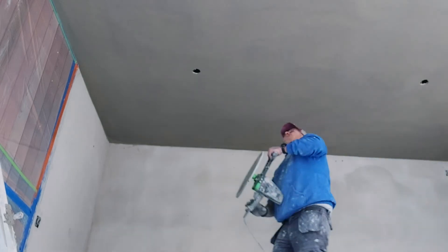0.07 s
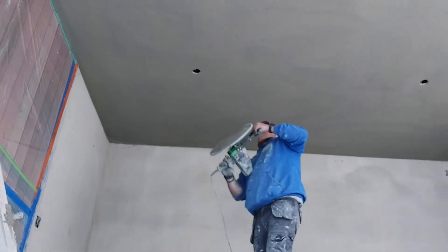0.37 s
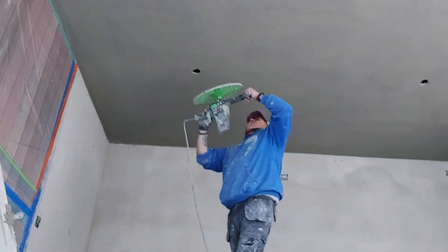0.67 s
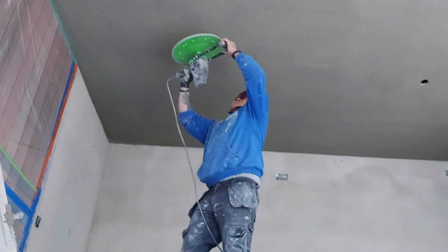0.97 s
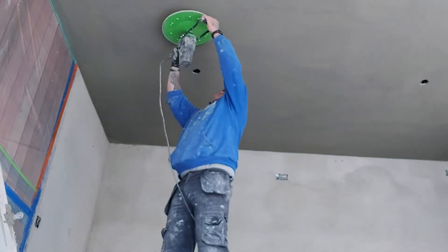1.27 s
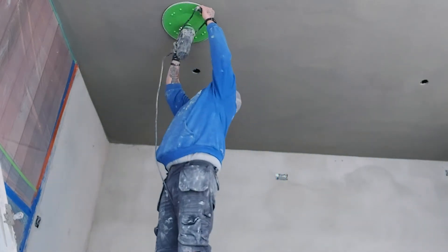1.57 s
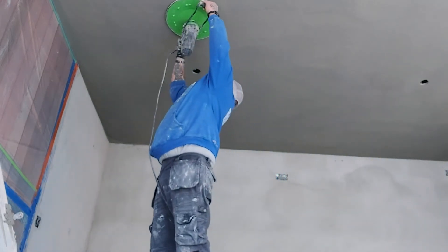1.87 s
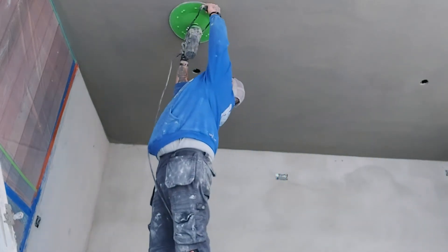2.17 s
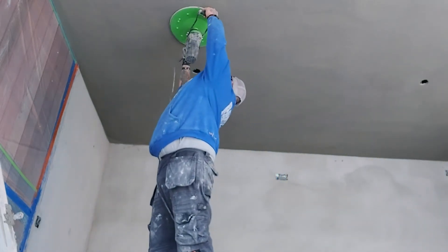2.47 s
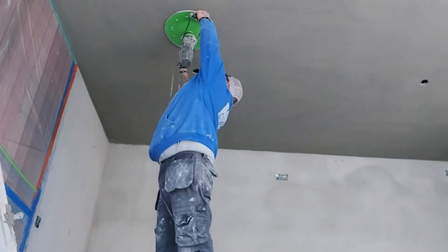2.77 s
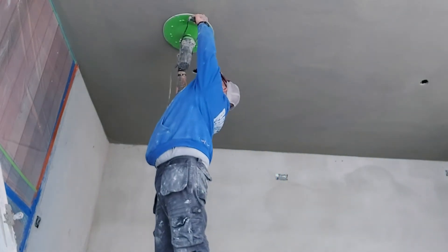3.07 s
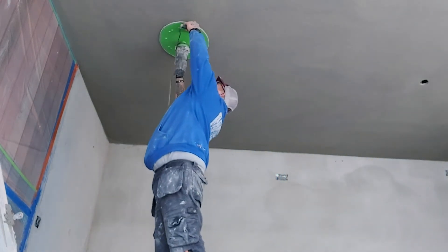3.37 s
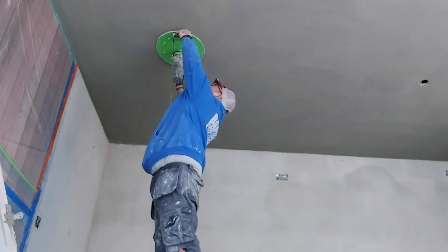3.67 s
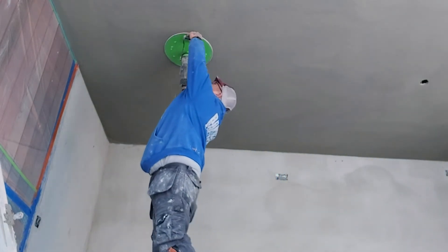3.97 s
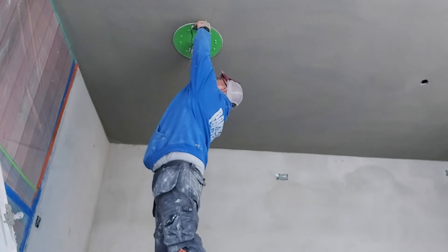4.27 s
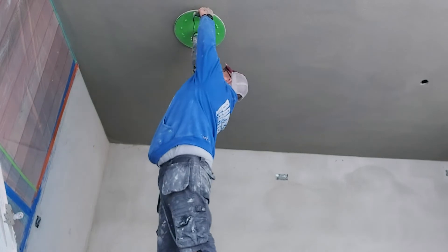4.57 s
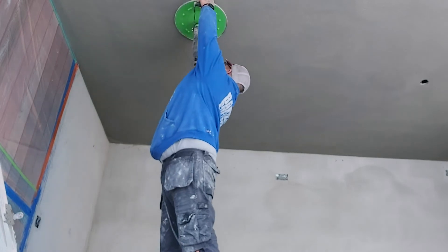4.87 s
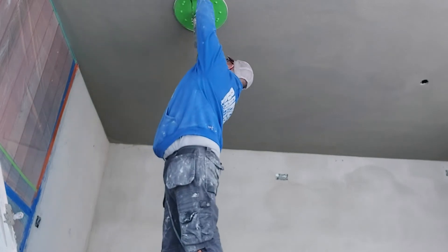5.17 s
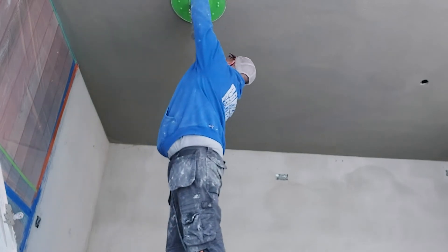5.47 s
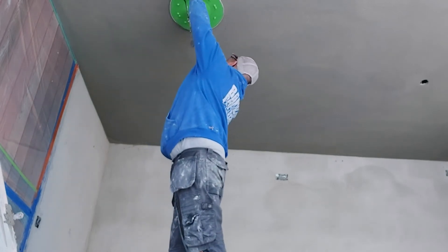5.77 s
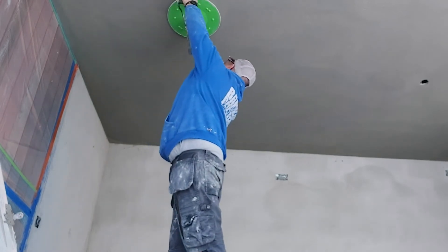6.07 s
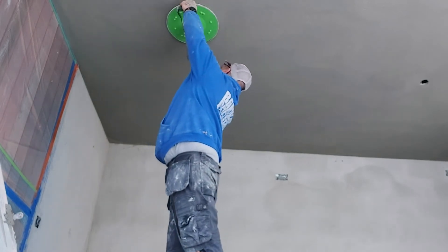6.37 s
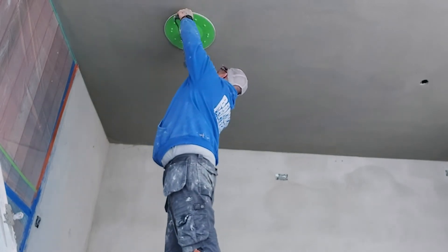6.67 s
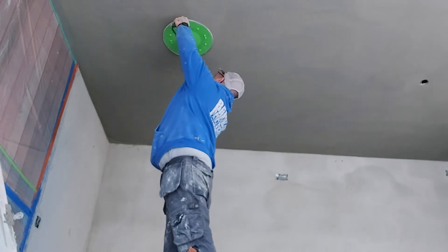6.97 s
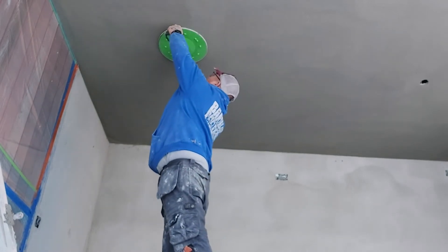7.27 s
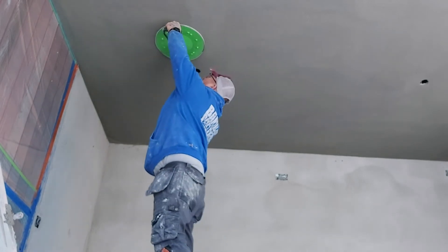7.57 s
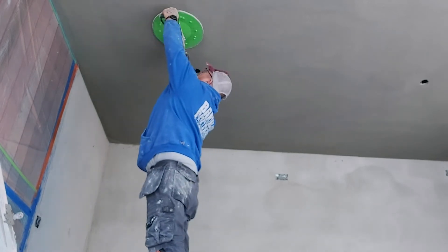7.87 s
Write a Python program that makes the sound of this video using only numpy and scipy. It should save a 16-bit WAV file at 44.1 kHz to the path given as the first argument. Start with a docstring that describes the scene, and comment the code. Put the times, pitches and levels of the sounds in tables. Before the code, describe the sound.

An electric plastering float bumps and scuffs as it is handled, then spins up and works a ceiling without stopping. The motor's hum and fan whistle dip slightly in pitch under pressure, mixed with gear rattle, short squeals and a steady airy hiss. Gritty scrapes come and go as the pad passes over coarser plaster. The microphone is in the same bare room, picking up a little of its short echo.

```python
"""Electric float on a plaster ceiling

In a bare room a plasterer lifts his float; it knocks in his hands and its pad scuffs the ceiling.
The motor starts softly and whirrs on, sagging as he leans in: the rotor hums, the fan whistles,
the gears sing, squeal and rattle, the pad scrapes over sandy plaster and the vents hiss."""
import sys
import numpy as np
from scipy import signal
from scipy.fft import rfft, irfft, next_fast_len
from scipy.io import wavfile

SR = 44100
rng = np.random.default_rng(int(sys.argv[2]) if len(sys.argv) > 2 else 0)


def store_pcm(level_fs):
    """Save levels as 16-bit WAV."""
    pcm = np.round(np.clip(level_fs, -1, 1) * 32767).astype(np.int16)
    wavfile.write(sys.argv[1], SR, np.atleast_2d(pcm).T)


N = 348831
TIME = np.arange(N) / SR
ON_S, RUN_UP_S, ENGAGE_S = 1.4, .208, .14  # soft start: switch-on, speed time constant, fade-in
FULL_SPEED_HZ, FAN_BLADES = 408, 11
PINION_TEETH, WHEEL_TEETH, SECOND_PINION_TEETH = 5, 67, 11
ROOM_T60_S, ROOM_TONE_DB = .3, -54

# Bumps as the float goes up. Each row: start in seconds, relative level in dB, scuff trim in dB,
# contact time in seconds, housing ring in dB.
CONTACTS = [(0.0, -58, -2, 0.01, -58), (0.094, -41, -18, 0.013, -53), (0.224, -45.5, -5, 0.035, -52),
            (0.311, -45, -6.5, .02, -54), (0.37, -59.5, 0.5, 0.081, -71), (0.472, -57, 0.5, 0.011, -69),
            (0.585, -61, 3, .02, -51), (0.615, -62, 9, 0.018, -57), (0.685, -61, 3, 0.02, -51),
            (0.8, -60, -1, 0.042, -76), (0.868, -48, -7.5, 0.023, -60), (1.0, -51, -6, 0.06, -61),
            (1.048, -35.5, -2, 0.041, -64), (1.19, -62, -12, 0.016, -57), (1.279, -42, -14, 0.073, -68),
            (1.385, -60, 4.5, 0.13, -54)]
# The housing's ring. Each row: pitch in Hz, bandwidth in Hz, relative level in dB.
HOUSING_MODES = [(1797, 20, 2), (1960, 34, -1), (2166, 32, 3)]

# Tone colours of the noise layers. Each row: frequency in Hz, relative level in dB.
KNOCK_EQ = [(88, -49), (150, -22), (298, -5.5), (413, 4), (456, -5), (527, -1), (1180, -15), (1300, -35),
            (1690, -43), (2860, -120)]
SCUFF_EQ = [(88, -48), (150, -14), (348, -16), (759, -0.5), (1080, 0), (1240, -12), (1310, -1),
            (1900, -5.5), (2650, -14), (2920, -7), (3290, -9), (4490, -6.5), (7320, -10), (8900, -20),
            (16000, -24)]
ROOM_EQ = [(15, -35), (25, -8), (82, 6.5), (223, -6), (405, -2.5), (607, -9), (936, -6.5), (1260, -16),
           (1740, -6.5), (2000, -13), (2480, -8), (7920, -20), (9320, -30), (13200, -23.5), (16000, -42)]
RUB_EQ = [(25, -82), (55, -33), (82, -6.5), (120, -17), (170, -11.5), (280, -13.5), (450, -4), (560, 3.5),
          (760, -7.5), (950, 1.5), (1100, -8), (1280, -25), (1800, -57)]
HISS_EQ = [(900, -23.5), (1280, -10), (1670, 2.5), (2020, 5), (2500, 3), (3000, 7), (5000, -6.5),
           (5850, -7.5), (6950, -7.5), (7800, -3.5), (8600, -13.5), (9550, -19), (11200, -12),
           (15500, -19.5)]  # shared by rasp, rattle and vents

# The speed the motor heads for under load. Each row: time in seconds, turns per second.
MOTOR_SPEED = [(2.6, 412.0), (3.0, 413.3), (3.55, 408.0), (3.73, 409.5), (3.9, 419.5), (4.08, 423.0),
               (4.27, 420.0), (4.45, 414.0), (5.1, 405.5), (5.44, 398.6), (5.72, 405.0), (6.62, 412.0),
               (6.76, 409.5), (7.08, 401.5), (7.33, 409.5), (7.78, 407.0), (7.91, 403.5)]
# Faint tones that fill out the whirr. Each row: multiple of rotor speed, relative level in dB.
WHIRR_PARTIALS = [(2, -59), (6, -59), (7, -58), (9, -60), (12, -59), (13, -59), (14, -54), (15, -47),
                  (16, -54), (17, -56), (19, -49), (20, -59), (22, -58), (24, -67), (25, -64), (32, -69),
                  (36, -70)]
# Top end of the second gear stage. Each row: multiple of its tooth rate, level in dB.
GEAR_PARTIALS = [(4, -50), (5, -45.5), (6, -53), (7, -58.5)]

# Fader rides. Each row: time in seconds, relative level in dB.
HUM_RIDE = [(1.66, -65), (1.74, -42), (1.98, -43), (2.3, -33.7), (3.34, -31.5), (3.42, -41), (4.46, -32.5),
            (4.78, -35), (5.26, -33.0), (5.42, -41.5), (5.58, -33.5), (6.7, -32.5), (7.02, -36.5),
            (7.89, -37)]
WHISTLE_RIDE = [(1.6, -33), (1.84, -31), (1.9, -42), (1.96, -28.5), (2.2, -34), (2.26, -30), (2.5, -32.5),
                (2.8, -35.5), (3.1, -29.0), (3.28, -41), (3.4, -31.5), (4.18, -35.5), (4.24, -44),
                (4.66, -26), (4.96, -29), (5.32, -31.5), (5.62, -25.5), (6.34, -33.5), (6.58, -33),
                (6.64, -39), (6.76, -32), (7.18, -42), (7.3, -27.5), (7.6, -34.5), (7.72, -31),
                (7.9, -40.1)]  # swells and fades as the float is swept about
LOW_WHISTLE_RIDE = [(1.6, -35), (1.9, -34), (2.56, -53), (2.74, -43), (3.04, -48.9), (3.1, -35),
                    (3.28, -42), (3.4, -36), (3.52, -45), (4.0, -37), (4.12, -45), (4.24, -35.5),
                    (4.42, -43), (4.48, -33), (5.14, -39), (5.5, -41), (5.92, -28), (6.76, -51),
                    (6.82, -43.5), (7.9, -47)]
GEAR_SONG_RIDE = [(1.8, -54), (1.96, -33), (2.04, -44), (3.08, -55.5), (3.32, -39.5), (3.8, -61),
                  (4.04, -38), (4.52, -47.5), (5.16, -37.6), (6.04, -39.5), (6.68, -50.5), (7.08, -33.5),
                  (7.4, -51), (7.89, -42)]
GEAR_OCTAVE_RIDE = [(1.9, -49), (2.98, -41), (4.06, -49), (5.74, -63), (5.98, -33.5), (6.16, -53),
                    (6.64, -34), (7.48, -58.5), (7.9, -36)]
VENT_RIDE = [(2.1, -31.5), (2.11, -32), (2.86, -31.5), (3.29, -32), (3.38, -29.5), (3.81, -34), (4.51, -33),
             (7.72, -33.5), (7.9, -34)]
# How hard the tool works. Each row: time in seconds, then relative levels in dB of disc rumble,
# pad rub and gear rattle.
WORK_RIDES = [(1.53, -45, -36, -39), (1.78, -50, -36, -37), (1.85, -50, -35.5, -36),
              (1.88, -49, -38, -37.5), (2.13, -49.5, -37, -37), (2.77, -50, -40.5, -37),
              (3.07, -49.5, -36, -37), (3.43, -56, -38, -34.5), (3.64, -44.5, -37.5, -37),
              (3.8, -53, -38, -40.5), (4.07, -51, -35.5, -38.5), (4.15, -44.5, -40, -38.5),
              (4.28, -55, -37, -38), (5.43, -52, -37.5, -39.5), (5.48, -75, -38, -38.5),
              (6.55, -52, -38, -38.5), (7.51, -54, -37, -39), (7.56, -51, -41.5, -40),
              (7.69, -60, -40.5, -38), (7.9, -53, -35.5, -39)]

# The pinion's whine flares up. Each row: start in seconds, length in seconds, level in dB.
PINION_SQUEALS = [(1.88, .09, -32), (2.53, 0.13, -37.5), (3.07, 0.11, -40), (3.92, 0.13, -35.5),
                  (4.24, 0.079, -31), (5.31, .11, -34), (5.5, 0.068, -38.5), (5.72, .22, -40.5),
                  (6.28, 0.055, -37), (6.75, 0.074, -34.5), (7.28, 0.26, -34), (7.62, 0.11, -33)]
# The pad hits coarser sand. Each row: start in seconds, length in seconds, relative level in dB.
SAND_SCRAPES = [(1.94, .04, -33), (2.07, 0.025, -33), (2.5, 0.053, -36), (2.68, 0.27, -38),
                (3.27, .22, -36), (4.41, .07, -31), (4.6, .2, -37), (5.0, 0.17, -36), (5.47, 0.049, -49),
                (5.74, 0.14, -33.5), (6.88, 0.071, -45)]

# Stereo focus. Each row: frequency in Hz, likeness of left and right from 0 to 1.
STEREO_LIKENESS = [(60, .95), (450, .96), (760, .65), (1350, .62), (1680, .3), (1950, .55), (2700, .12),
                   (4000, .33), (6000, .4), (8000, .2), (15000, .1)]
# Panning. Each row: frequency in Hz, left minus right in dB.
STEREO_BALANCE = [(200, -.9), (400, -3), (700, -2.8), (950, -.6), (1450, -2.3), (2600, 3.5), (3400, .2),
                  (4100, 0), (4500, -3.3), (5900, -7.5), (7400, -1), (8300, -7), (9800, 3), (13000, -.3)]
# Later arrival on the left. Each row: frequency in Hz, lag in seconds.
STEREO_LAG = [(100, .00005), (400, .00011), (700, .00005), (1100, .00014), (1300, .00035), (1550, .0003),
              (1800, .00003), (2200, 0), (3000, .00012), (4080, .000154), (4500, .000151), (5100, .000106),
              (7000, .000143), (15000, .00015)]
# Bounces off ceiling, arms and wall. Each row: delay in seconds, its sway in seconds, level in dB.
EARLY_REFLECTIONS = [(.0013, .0003, -13), (.0034, .0004, -12), (.0085, .0006, -11)]


def amp(db):
    """Decibels to gain."""
    return 10 ** (np.asarray(db) / 20)


def unit_rms(x):
    """Scale to an rms of 1."""
    return x / np.sqrt(np.mean(x ** 2) + 1e-20)


def ride(rows, column=1):
    """One column of an automation curve at every sample."""
    columns = np.transpose(rows)
    return np.interp(TIME, columns[0], columns[column])


def at_hz(points, hz):
    """Read a curve on a log-frequency axis."""
    freqs, values = np.transpose(points)
    return np.interp(np.log(np.maximum(hz, 1)), np.log(freqs), values)


def drift(rate_hz):
    """A smooth random wobble with a spread of about 1."""
    pole = np.exp(-80 * np.pi * rate_hz / SR)  # one step every 40 samples
    slow = signal.lfilter([1], [1, -2 * pole, pole * pole], rng.standard_normal(N // 40 + 2002))[2000:]
    return np.interp(np.arange(N) / 40, np.arange(len(slow)), unit_rms(slow))


def bursts(rows, attack_s, release_s):
    """Envelope of events that each rise, hold and die away."""
    return sum(amp(db) * np.clip((TIME - start) / attack_s, 0, 1)
               * np.exp(-np.maximum(TIME - start - length, 0) / release_s) for start, length, db in rows)


def grains(per_s, spread_db):
    """Grit: random ticks, a few harder than the rest."""
    sizes = amp(spread_db * np.minimum(rng.exponential(1, N), 5))
    return (rng.random(N) < per_s / SR) * sizes * rng.standard_normal(N)


def resonance(x, hz, width_hz):
    """A ringing band with unity gain at its peak."""
    r = np.exp(-np.pi * width_hz / SR)
    poles = [1, -2 * r * np.cos(2 * np.pi * hz / SR), r * r]
    return signal.lfilter(np.array([1, 0, -1]) * (1 - r * r) / 2, poles, x)


def split(x, hz):
    """Crossover: the lows and the highs."""
    low = signal.sosfilt(signal.butter(2, hz, "low", fs=SR, output="sos"), x)
    high = signal.sosfilt(signal.butter(2, hz, "high", fs=SR, output="sos"), x)
    return low, -high


def pan(hz):
    """Complex left and right gains that place the float by level and lag."""
    half_db = at_hz(STEREO_BALANCE, hz) / 2
    return np.array([amp(half_db) * np.exp(-2j * np.pi * hz * at_hz(STEREO_LAG, hz)), amp(-half_db)])


def in_room(excitation, eq):
    """Widen a noise with the room's diffuse wash and colour it; the mid has an rms of 1."""
    size = next_fast_len(N)
    hz = np.arange(size // 2 + 1) * SR / size
    alike = np.clip(at_hz(STEREO_LIKENESS, hz), 0, 1)
    direct = np.sqrt(alike) * rfft(unit_rms(excitation), size)
    wash = np.sqrt(1 - alike) * rfft(rng.standard_normal((2, N)), size)
    stereo = irfft((direct + wash) * pan(hz) * amp(at_hz(eq, hz)), size)[:, :N]
    return stereo / np.sqrt(np.mean(stereo.mean(axis=0) ** 2))


def reflected(x):
    """Nearby surfaces comb the sound; the combs shift as the float is swept about."""
    combed = x.copy()
    for delay, sway, db in EARLY_REFLECTIONS:
        late = TIME - delay - sway * drift(.552)
        combed += amp(db) * np.array([np.interp(late, TIME, channel) for channel in x])
    return combed / np.sqrt(1 + sum(amp(db) ** 2 for _, _, db in EARLY_REFLECTIONS))


def tone(turns, multiple, diffuse, fade_hz, steady=False):
    """A partial whose level and phase swim with the reflections; steady holds its total power."""
    hz = multiple * FULL_SPEED_HZ
    knots = np.arange(0, TIME[-1] + 1, 1 / 40)
    pole = np.exp(-2 * np.pi * fade_hz / 40)
    wander = signal.lfilter([1], [1, -2 * pole, pole * pole], rng.standard_normal((3, 2, len(knots))))
    wander = unit_rms(wander) / np.sqrt(2)
    echo = wander[:, 0] + 1j * wander[:, 1]  # left, right, shared
    alike = np.clip(at_hz(STEREO_LIKENESS, hz), 0, 1)
    wash = np.sqrt(alike) * echo[2] + np.sqrt(1 - alike) * echo[:2]
    paths = (1 + diffuse * wash) * pan(hz)[:, None]
    power = np.mean(abs(paths) ** 2, axis=0)
    paths *= np.sqrt(2 / (power if steady else power.mean()))
    carrier = np.exp(2j * np.pi * multiple * turns)
    return np.array([(np.interp(TIME, knots, path) * carrier).real for path in paths])


def handling():
    """Each contact knocks, scuffs and sets the housing ringing, then dies away in the bare room."""
    knock_power, scuff_power, ring_power = np.zeros((3, N))
    for start, level_db, scuff_db, contact_s, ring_db in CONTACTS:
        age = TIME - start
        envelope = np.clip(age / .0086, 0, 1) * amp(-60 * np.maximum(age - contact_s, 0) / ROOM_T60_S)
        knock_power += (envelope * amp(level_db - 7)) ** 2
        scuff_power += (envelope * amp(level_db + scuff_db + 1.5)) ** 2
        ring_power += (envelope * amp(ring_db)) ** 2
    knock = in_room(grains(per_s=2700, spread_db=1), KNOCK_EQ)
    scuff = in_room(grains(per_s=4600, spread_db=1), SCUFF_EQ)
    ring = unit_rms(sum(amp(db) * resonance(scuff, hz, width) for hz, width, db in HOUSING_MODES))
    return np.sqrt(knock_power) * knock + np.sqrt(scuff_power) * scuff + np.sqrt(ring_power) * ring


def room_tone():
    """A soft, bass-heavy bed of noise."""
    return amp(ROOM_TONE_DB) * in_room(rng.standard_normal(N), ROOM_EQ)


def motor(run_up, turns):
    """The unbalanced rotor hums, the fan blades whistle, and rougher multiples fill in the whirr."""
    # The fan only whistles above half speed, and sounds broken until it runs freely.
    whistling = np.clip((run_up - .5) / .44, 0, 1)
    shaky_turns = turns + (.004 + .08 * (1 - run_up)) * drift(70)
    flutter_db = 1.55 + 6 * (1 - run_up)
    hum_gain = amp(ride(HUM_RIDE) - .06 + 1.52 * drift(6.6))
    hum = hum_gain * tone(turns, 1, diffuse=.088, fade_hz=3.6, steady=True)
    whistle_gain = amp(ride(WHISTLE_RIDE) - 1.23 + flutter_db * drift(24))
    whistle = whistle_gain * tone(shaky_turns, FAN_BLADES, diffuse=.62, fade_hz=2.6, steady=True)
    low_gain = amp(ride(LOW_WHISTLE_RIDE) - .5 + flutter_db * drift(16))
    low_whistle = low_gain * tone(shaky_turns, FAN_BLADES - 1, diffuse=1.2, fade_hz=2.54, steady=True)
    rough_turns = turns + .008 * drift(120)
    whirr = sum(amp(db + 7) * tone(rough_turns, k, diffuse=2.5, fade_hz=3.5) for k, db in WHIRR_PARTIALS)
    return hum + whistling * (whistle + low_whistle) + run_up ** 4 * whirr


def gears(run_up, sag_hz, turns, wheel_turns):
    """The pinion whines and squeals, wavering with the big wheel; the second stage sings and growls."""
    runout = .014 * np.sin(2 * np.pi * wheel_turns) + .012 * np.sin(4 * np.pi * wheel_turns)
    whine = amp(-43.5 + 2.1 * drift(10.6)) * run_up ** 4
    squeals = bursts(PINION_SQUEALS, attack_s=.025, release_s=.022)
    pinion = tone(turns + runout, PINION_TEETH, diffuse=.76, fade_hz=2.3, steady=True)
    mesh = SECOND_PINION_TEETH * PINION_TEETH / WHEEL_TEETH  # second-stage teeth per rotor turn
    song_gain, octave_gain = amp(ride(GEAR_SONG_RIDE) - 1.2), amp(ride(GEAR_OCTAVE_RIDE) - 3.5)
    song = song_gain * tone(turns, 3 * mesh, diffuse=.98, fade_hz=2.1, steady=True)
    octave = octave_gain * tone(turns, 2 * mesh, diffuse=.99, fade_hz=2.5, steady=True)
    growl = amp(-46 + .3 * sag_hz) * tone(turns, mesh, diffuse=.48, fade_hz=7.2)  # louder under load
    upper = sum(amp(db) * tone(turns, k * mesh, diffuse=.79, fade_hz=2.7) for k, db in GEAR_PARTIALS)
    return np.hypot(whine, squeals) * pinion + song + run_up ** 4 * (growl + octave + upper)


def pad(run_up, grip, throb):
    """The disc rumbles while its pad rubs the plaster and rasps over grains of sand."""
    rumble, rub = split(in_room(grains(per_s=4000, spread_db=1), RUB_EQ), hz=242)
    grit = reflected(in_room(grains(per_s=5000, spread_db=3), HISS_EQ))
    rasp = resonance(grit, hz=5850, width_hz=700)
    scrapes = amp(9) * bursts(SAND_SCRAPES, attack_s=.019, release_s=.094)
    rasp_gain = np.hypot(amp(-25.5) * run_up, scrapes)
    rumble_gain = amp(ride(WORK_RIDES, column=1) + 14.5)
    rub_gain = amp(ride(WORK_RIDES, column=2) - .8 + grip) * throb
    return rumble_gain * rumble + rub_gain * rub + rasp_gain * rasp


def rattle_and_vents(run_up, grip, throb):
    """One grainy noise in two bands: gear teeth rattle below, cooling air hisses from the vents above."""
    noise = reflected(in_room(grains(per_s=7000, spread_db=2.5), HISS_EQ))
    lows, hiss = split(noise, hz=2786)
    _, rattle = split(lows, hz=90)
    chatter_db = .8 * grip + .7 * drift(14)
    rattle_gain = amp(ride(WORK_RIDES, column=3) + 9.5 + chatter_db) * throb
    hiss_gain = amp(ride(VENT_RIDE) + 4.4 + 1.06 * grip) * run_up ** .6
    return rattle_gain * rattle + hiss_gain * hiss


def scene():
    """The float is lifted in the quiet room, spins up and works the ceiling."""
    target_hz = ride(MOTOR_SPEED)
    since_on = np.maximum(TIME - ON_S, 0)
    run_up = 1 - np.exp(-since_on / RUN_UP_S)
    turns = np.cumsum(target_hz * run_up * (1 + .00051 * drift(9.2))) / SR
    wheel_turns = turns * PINION_TEETH / WHEEL_TEETH
    tones = motor(run_up, turns) + gears(run_up, FULL_SPEED_HZ - target_hz, turns, wheel_turns)
    grip = drift(10.5)  # the pad catches and lets go
    throb = 1 + .1 * np.sin(2 * np.pi * wheel_turns) + .1 * np.sin(6 * np.pi * wheel_turns)
    noises = pad(run_up, grip, throb) + rattle_and_vents(run_up, grip, throb)
    fade_in = np.clip(since_on / ENGAGE_S, 0, 1) ** 1.87
    return handling() + room_tone() + fade_in * (tones + noises)


def record(dry):
    """Thin the deepest bass and cut the very top steeply."""
    thinned = signal.sosfilt(signal.butter(2, 28, "high", fs=SR, output="sos"), dry)
    return signal.sosfilt(signal.ellip(12, .1, 90, 15750, fs=SR, output="sos"), thinned)


dry = scene()
out = record(dry)
store_pcm(out)
```